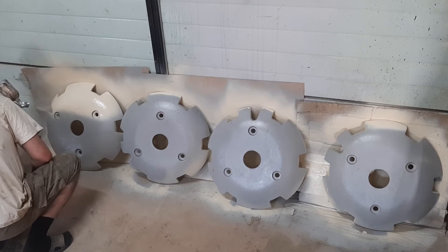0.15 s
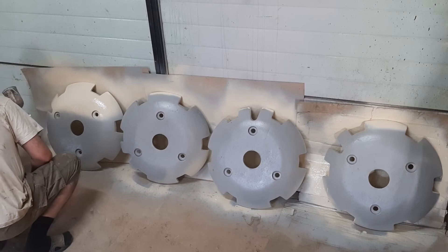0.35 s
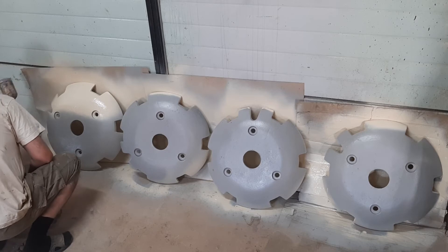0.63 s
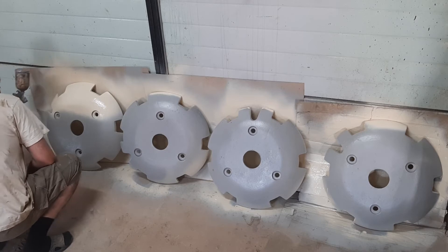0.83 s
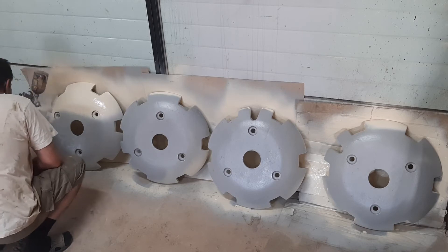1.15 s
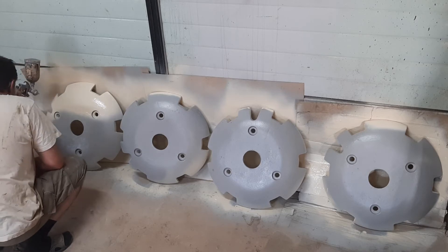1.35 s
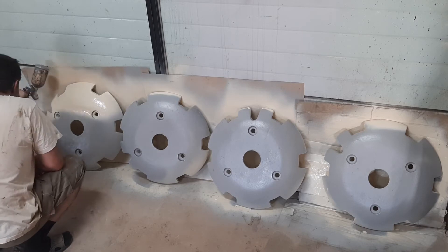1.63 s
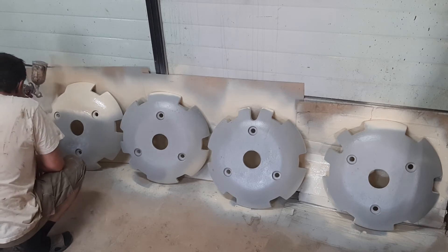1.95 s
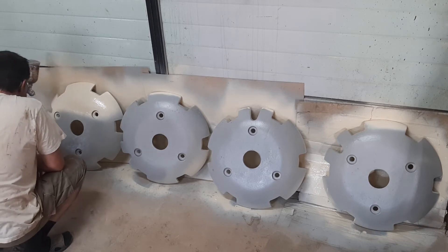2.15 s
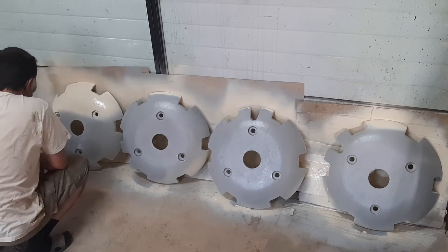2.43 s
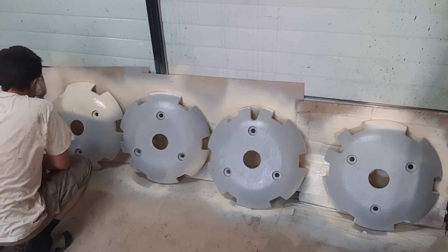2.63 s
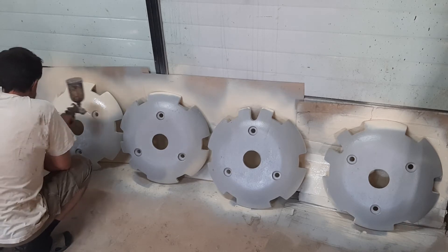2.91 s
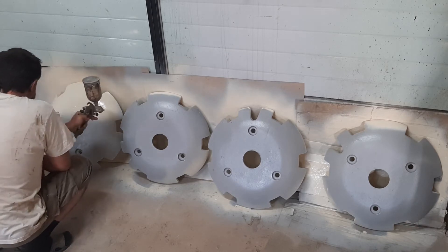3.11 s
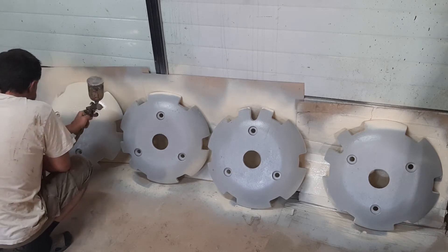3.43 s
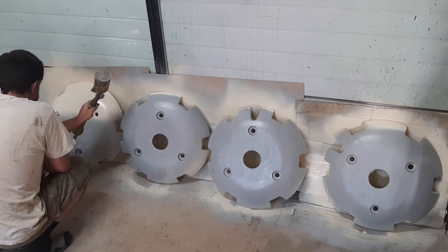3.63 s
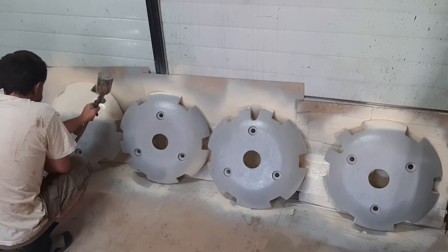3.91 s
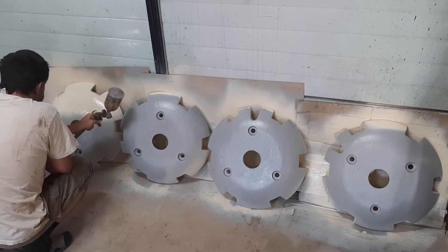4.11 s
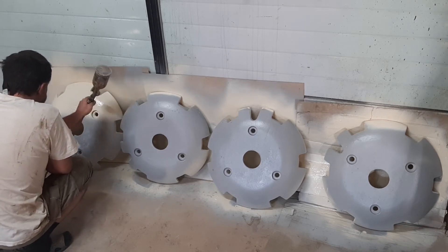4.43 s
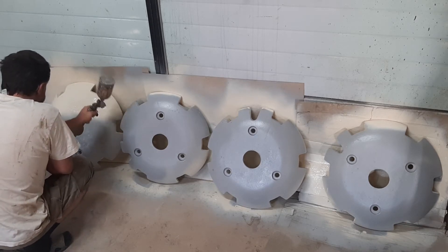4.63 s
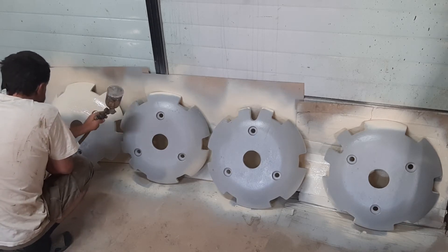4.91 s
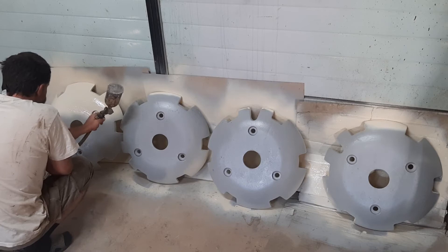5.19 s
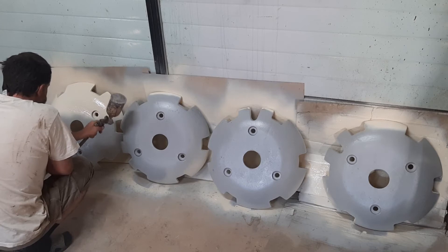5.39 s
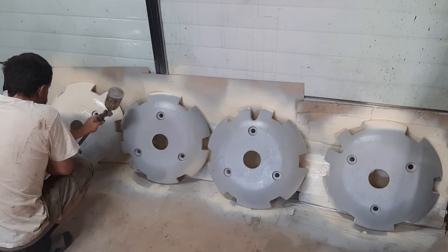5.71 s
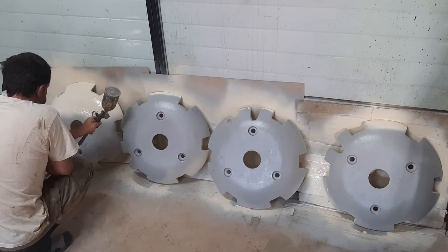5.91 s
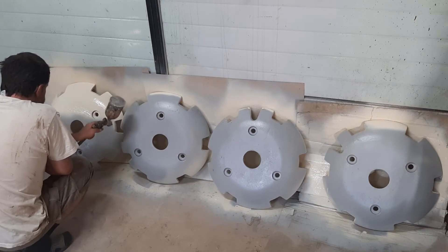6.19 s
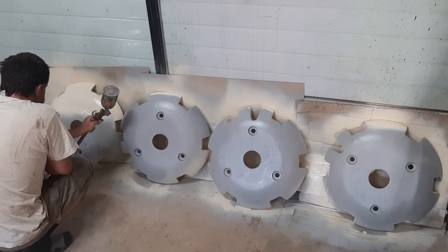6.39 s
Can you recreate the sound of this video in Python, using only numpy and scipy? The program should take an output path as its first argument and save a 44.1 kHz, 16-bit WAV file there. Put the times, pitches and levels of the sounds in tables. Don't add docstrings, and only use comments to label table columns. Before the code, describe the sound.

Short sharp blasts of spray-gun air surge, settle and cut off over hollow metal, with early cardboard scrapes and knocks in a hard-walled room.

```python
import sys
import numpy as np
from scipy import signal
from scipy.fft import rfft, irfft, next_fast_len
from scipy.io import wavfile
from scipy.ndimage import uniform_filter1d

SR = 44100
rng = np.random.default_rng(int(sys.argv[2]) if len(sys.argv) > 2 else 0)


def log_audio(samples):
    frames = np.atleast_2d(samples).T
    limited = np.clip(frames, -1, 1)
    pcm = np.round(limited * 32767).astype(np.int16)
    wavfile.write(sys.argv[1], SR, pcm)


def field_ratio(decibels):
    return 10 ** (np.asarray(decibels, dtype=float) / 20)


N = 288855

# valve opens [s], shuts [s], surge level [dB], settled level [dB],
# settling time [s].
PULLS = [
    (0.0, .424, -24, -36, 0.12),
    (0.88, 1.249, -24.5, -35, 0.1),
    (1.609, 1.924, -26.5, -34.5, 0.079),
    (2.422, 3.059, -26.5, -36.5, 0.12),
    (3.819, 4.141, -23, -36, 0.11),
    (4.528, 4.768, -25, -33, 0.058),
    (5.16, 5.498, -24.5, -34, 0.09),
    (5.832, 6.13, -24.5, -34, 0.08),
]


def evened(x):
    return x / np.sqrt(np.mean(x ** 2) + 1e-20)


def read(points, hz):
    f, value = np.transpose(points)
    return np.interp(np.log(hz + 1), np.log(f + 1), value)


def hiss(colour, patchy_db):
    a, b, patches = rng.standard_normal((3, N // 256 + 5, 513)).transpose(0, 2, 1)
    patches = uniform_filter1d(patches, size=14, axis=0)
    patches = evened(uniform_filter1d(patches, size=10, axis=1))
    colour_db = read(colour, np.fft.rfftfreq(1024, 1 / SR))[:, None]
    z = (a + 1j * b) * field_ratio(colour_db + patchy_db * patches)
    return evened(signal.istft(z, nperseg=1024, noverlap=768)[1][:N])


def ring(x, modes):
    out = []
    for k, (hz, width, db) in enumerate(modes):
        peak = signal.iirpeak(hz, hz / width, SR)
        out.append((-1) ** k * field_ratio(db) * signal.lfilter(*peak, x))
    return np.array(out)


def played(tables, level, rise, fall):
    out = np.zeros(N)
    for rows, up in zip(tables, rise * np.ones(len(tables))):
        s, *columns = np.transpose(rows)
        first = max(0, round((s[0] - 70 / up) * SR))
        last = min(N, round((s[-1] + 70 / fall) * SR))
        at = np.arange(first, last)
        ramp = up * np.maximum(s[0] - at / SR, 0) + fall * np.maximum(at / SR - s[-1], 0)
        out[at] += field_ratio(np.interp(at / SR, s, level(columns)) - ramp)
    return out


def strokes(rows):
    return [[(start, db, *more), (end, end_db, *more)] for start, end, db, end_db, *more in rows]


def valve():
    # splash level [dB], its sag [dB/s], hollow roar level [dB], moment the fan faces the hollow [s].
    aim_rows = [(-37.5, 6.5, -43, 0.4), (-35, 14.5, -45.5, 1.276), (-37, -1.5, -44, 1.873),
                (-36, 7, -44, 2.805), (-36.5, 4.5, -44, 3.994), (-36, 9, -45.5, 4.61),
                (-36, 10.5, -44, 5.39), (-36, 2, -45, 5.99)]
    out = []
    for (start, end, surge_db, settled_db, settle), (splash_db, sag, hollow_db, aim) in zip(PULLS, aim_rows):
        s = np.linspace(start, end, 60)
        age = s - start
        ease_db = 3.5 * np.exp((s - end) / 0.052)
        surge = np.exp(-(age / settle) ** 1.55)
        opening_dip_db = -0.5 * np.exp(-age / 0.012)
        nozzle = settled_db + (surge_db - settled_db) * surge + opening_dip_db
        splash = splash_db - sag * age - ease_db
        fill_db = 11.5 * np.exp(-age / 0.028)
        sweep_db = 26 * abs(s - aim)
        hollow = hollow_db - fill_db - sweep_db - 2.2 * ease_db
        out.append(np.transpose([s, nozzle, splash, hollow]))
    return out


def spray():
    # frequency [Hz],
    # level per hertz [dB].
    jet_colour = [(3000, -30.5), (6000, -12.5), (7900, -1), (8400, -10), (10000, -3.5), (11800, 3.5),
                  (13500, 2.5), (15000, 4), (15800, -1)]
    splash_colour = [(900, -26), (2000, -9), (4000, -2), (6000, 0), (7900, -1), (8400, -2.5),
                     (10000, -16.5), (14000, -29.5)]
    hollow_colour = [(200, -22), (400, -5), (550, 2.5), (900, 0.5), (1500, 2.5), (2200, -2.5),
                     (4000, -12.5)]
    # how fast the valve opens [dB/s], air slipping past the needle just before [dB re the surge].
    opening_rows = [(3000, -39.5), (2200, -18), (2290, -40), (1850, -33.5), (2120, -40), (3600, -33),
                    (2170, -43), (4000, -36)]
    shut = 584
    speed, creep_db = np.transpose(opening_rows)
    creep_points = [[(row[0], row[2] + db)] for row, db in zip(PULLS, creep_db)]
    creep = played(creep_points, lambda c: c[0], 700, 3000)
    pulls = valve()
    jet = hiss(jet_colour, 0.53) * (played(pulls, lambda c: c[0] + 4.24, speed, shut) + creep)
    splash = hiss(splash_colour, 1.2) * played(pulls, lambda c: c[1], speed, shut)
    hollow = hiss(hollow_colour, 2.2) * played(pulls, lambda c: c[2], speed * 0.22, shut)
    return jet + splash + hollow


def bleed():
    # whistle frequency [Hz], width [Hz], level [dB].
    whistle_modes = [(5480, 180, 0), (7700, 600, -4), (10800, 600, -5), (12400, 300, -1), (15350, 300, -4)]
    below_db, t60 = -21.5, 0.86
    tails = [[(0, -63.5)]] + [[(row[1], row[3] + below_db)] for row in PULLS]
    whistling = evened(ring(rng.standard_normal(N), whistle_modes).sum(0))
    return whistling * played(tails, lambda c: c[0], 900, 60 / t60)


def trigger():
    # start [s], tick peak [dB], level of the thin hiss behind it [dB].
    tick_rows = [
        (.799, -45, -63),
        (1.5192, -55, -70),
        (2.357, -43, -62),
        (4.4705, -36, -59),
        (5.783, -39, -55.5),
        (6.5037, -45, -64),
        (6.523, -58, -94),
    ]
    # frequency [Hz], level per hertz [dB].
    seep_colour = [(900, -38.5), (2300, -21), (2900, -12), (4200, -7.5), (6000, -0.5), (7900, -4.5),
                   (8500, -29), (9800, -18.5), (12500, -8), (15800, -4.5)]
    # frequency [Hz], width [Hz], level [dB].
    click_modes = [(4000, 2000, -13.5), (7000, 3200, -10.5), (12500, 2500, -2)]
    ticks = np.zeros(N)
    for s, db, _ in tick_rows:
        burst = rng.standard_normal(40) * np.exp(-np.arange(40) / 14)
        ticks[round(s * SR):][:40] = field_ratio(db + 5) * burst
    seep = played([[(s, db)] for s, _, db in tick_rows], lambda c: c[0], 30000, 100)
    return ring(ticks, click_modes).sum(0) + hiss(seep_colour, 1.2) * seep


def scuffs():
    # start [s], end [s], start level [dB], end level [dB], brightness of the upper modes [dB].
    scuff_rows = [(0.0, .1, -41, -61, -0.5), (.135, .14, -39, -63, -5), (.2, .23, -63, -53, -2.5),
                  (.258, .3, -40, -44, -3.5), (.325, .44, -39, -43.5, -1.4), (.63, .66, -53.5, -56, -2),
                  (.68, .683, -50.5, -48.5, 2), (.71, .79, -46.5, -43, 0), (.81, .96, -43, -57, 3),
                  (.98, .985, -50, -52, -15), (1.01, 1.1, -75, -69, 5), (1.38, 1.5, -71.5, -84, 3.5),
                  (1.578, 1.58, -79, -61, -13), (2.193, 2.3, -70, -81, -21),
                  (3.12, 3.123, -53.5, -56.5, 6.5), (3.165, 3.26, -57, -62.5, 0.5),
                  (3.523, 3.6, -70, -94, -4.5), (4.88, 5.03, -74.5, -81, -3), (5.44, 5.52, -58, -58, -20),
                  (5.724, 5.8, -84, -84, -7)]
    # frequency [Hz], width [Hz], level [dB].
    board_modes = [(410, 120, -10), (525, 50, 0), (620, 90, -4), (780, 80, -8), (937, 60, -6),
                   (1130, 90, -10), (1330, 200, -14), (1550, 160, -16), (2050, 500, -26), (3300, 1300, -40)]
    strength = field_ratio(1.27 * np.minimum(rng.exponential(1, N), 4))
    happens = rng.random(N) < 900 / SR
    slips = strength * happens * rng.choice([-1, 1], N)
    modes = ring(evened(slips) + 0.56 * rng.standard_normal(N), board_modes)
    modes = np.array([np.roll(mode, shift=997 * k) for k, mode in enumerate(modes)])
    low, high = modes[:3].sum(0), modes[3:].sum(0)
    drags = strokes(scuff_rows)
    low_drag = low * played(drags, lambda c: c[0] - 1.5, 800, 370)
    high_drag = high * played(drags, lambda c: c[0] + c[1], 800, 400)
    return (low_drag + high_drag) / np.std(low)


def knocks():
    # start [s], peak level [dB], frequency [Hz].
    knock_rows = [
        (.262, -31, 620),
        (.33, -33, 1300),
        (.345, -33, 1540),
        (.678, -32, 570),
        (.726, -35, 540),
        (.804, -30, 670),
        (.82, -33, 740),
        (.844, -34, 600),
        (2.193, -62, 520),
    ]
    out, t = np.zeros(N), np.arange(2000) / SR
    for s, db, hz in knock_rows:
        envelope = field_ratio(db - 1600 * t) * (1 - np.exp(-t / .001))
        out[round(s * SR):][:len(t)] += envelope * np.sin(2 * np.pi * hz * t)
    return out


def gust():
    # start [s], end [s], start level [dB], end level [dB].
    puff_rows = [(0.0, .07, -66, -68), (.135, .43, -65, -48), (.88, 1.02, -77, -69), (1.1, 1.26, -56, -46),
                 (1.61, 1.63, -70, -68), (1.71, 1.75, -62, -52), (1.78, 1.85, -44, -46.5),
                 (1.89, 1.93, -48, -44.5), (2.49, 2.8, -47.5, -59.5), (2.85, 3.06, -77, -60),
                 (3.85, 4.06, -45.5, -57.5), (4.11, 4.14, -59, -51), (4.555, 4.77, -43, -63.5),
                 (5.25, 5.51, -55.5, -55.5), (5.88, 5.97, -47, -53), (6.0, 6.13, -48.5, -56)]
    # frequency [Hz], level per hertz [dB].
    gust_colour = [(30, -30), (60, -15), (125, -5), (200, -4), (320, -4), (600, -22)]
    # frequency [Hz], width [Hz], level [dB].
    shop_modes = [(120, 30, -9), (163, 13, -1), (254, 18, 0), (316, 14, -2), (410, 25, -7)]
    push = np.array([hiss(gust_colour, 0.83), hiss(gust_colour, 1)])
    push = push * played(strokes(puff_rows), lambda c: c[0], 600, 217)
    return field_ratio(-8.5) * push + field_ratio(6.5) * ring(push, shop_modes).sum(0)


def hums():
    # start [s], end [s], frequency [Hz], width [Hz], level [dB].
    hum_rows = [(3.29, 3.5, 2900, 50, -85), (3.36, 3.48, 750, 25, -84), (3.36, 3.46, 1430, 50, -87),
                (3.26, 3.38, 3800, 500, -85), (6.2, 6.5, 1540, 40, -85), (6.15, 6.36, 1150, 500, -78),
                (6.24, 6.48, 2950, 40, -84), (6.3, 6.5, 780, 200, -84), (6.28, 6.45, 290, 90, -86),
                (2.275, 2.285, 2150, 100, -88), (2.1, 2.2, 4000, 80, -88), (4.33, 4.37, 1500, 90, -87)]
    # start [s], peak level [dB], frequency [Hz].
    thud_rows = [(0.499, -69, 89), (0.869, -62, 80.7), (1.639, -61, 75.4), (2.429, -59, 129),
                 (3.38, -73, 83.4), (4.538, -60, 117), (5.85, -59, 98.4), (.78, -57, 120), (.46, -65, 68.3),
                 (3.09, -71, 60), (3.35, -75, 55)]
    out, t = np.zeros(N), np.arange(SR // 8) / SR
    for start, end, hz, width, db in hum_rows:
        tone = evened(ring(rng.standard_normal(N), [(hz, width, 0)])[0])
        out += tone * played([[(start, db), (end, db - 2.5)]], lambda c: c[0], 400, 300)
    age = t / 0.0079
    for s, db, hz in thud_rows:
        out[round(s * SR):][:len(t)] += field_ratio(db) * age * np.exp(1 - age) * np.sin(2 * np.pi * hz * t)
    return out


def room(x, count=6):
    # frequency [Hz], reverberation time t60 [s].
    decay_times = [(100, 0.52), (500, 0.35), (2000, 0.35), (6000, 0.32), (12000, 0.2), (16000, 0.16)]
    lead = 900
    taps = np.zeros((count, 2, SR // 2))
    at = np.arange(60, SR // 2 - 8, 8)
    at = at + rng.integers(0, 8, (count, 2, len(at)))
    np.put_along_axis(taps, at, rng.choice([-1., 1.], at.shape), 2)
    hz, t, z = signal.stft(taps, SR, nperseg=256)
    decay = field_ratio(-60 * t / read(decay_times, hz)[:, None])
    tails = signal.istft(z * decay, SR, nperseg=256)[1]
    turn = (np.arange(N) / 800 - np.arange(count)[:, None]) % count
    fed = x * np.sin(np.pi / 2 * np.minimum(turn, 2))
    fed = np.pad(fed, ((0, 0), (lead, 0)), "reflect")
    size = next_fast_len(N + SR)
    wet = (rfft(fed, size)[:, None] * rfft(tails, size)).sum(0)
    return irfft(wet, size)[:, lead:lead + N] / np.linalg.norm(tails[0, 0])


def quiet():
    # frequency [Hz], level per hertz [dB].
    quiet_colour = [(35, -39), (60, -6.5), (184, -14.5), (237, -15), (631, -20), (1030, -25.5), (4570, -18),
                    (6040, -8), (7810, -10), (9190, -22), (11300, -8), (12700, -10.5), (14600, -7),
                    (15700, -7.5)]
    return field_ratio(-75 + 7.0) * np.array([hiss(quiet_colour, 2.3), hiss(quiet_colour, 3.3)])


def scene():
    wide = spray() + bleed() + scuffs()
    sharp = hums() + trigger() + knocks()
    near = field_ratio(-8) * wide + sharp
    direct = np.array([near, np.roll(near, shift=4)])
    return direct + room(field_ratio(-0.25) * wide + field_ratio(-0.5) * sharp) + gust() + quiet()


def mono_edge(t):
    # starts [s], lowest at [s], lowest edge [Hz], free again [s].
    narrowings = [
        (-.03, .55, 9000, .92),
        (.55, 1.38, 10000, 1.57),
        (1.66, 2.1, 10400, 2.24),
        (2.74, 3.2, 9700, 3.41),
        (5.87, 6.28, 10400, 6.44),
    ]
    free, knee = 16500, 12800
    edges = [np.interp(t, [start, start + .14, lowest, end], [free, knee, low, free])
             for start, lowest, low, end in narrowings]
    return np.min(edges, axis=0)


def roll_off(x):
    return signal.sosfilt(signal.butter(12, 17020, fs=SR, output="sos"), x)


def record(dry):
    # frequency [Hz], left-right likeness [0 to 1].
    likeness = [(30, 0), (130, 0.83), (300, 0.94), (640, 0.49), (1400, 0.079), (2500, .0)]
    # frequency [Hz], left minus right [dB].
    lean_points = [(100, -2.5), (600, -3.5), (2500, -3), (5000, -2), (7700, -1), (8500, -4), (12000, -5),
                   (15800, -4)]
    hz, t, (left, right) = signal.stft(dry, SR, nperseg=1024, noverlap=768)
    same = np.clip(read(likeness, hz), 0, .99)[:, None]
    mid = (left + right) / 2 * np.sqrt(1 + same)
    side = (left - right) / 2 * np.sqrt(1 - same)
    joint = hz[:, None] > mono_edge(t)
    mid, side = np.where(joint, left, mid), np.where(joint, 0, side)
    lean = field_ratio(read(lean_points, hz)[:, None] / 2)
    passed = (hz < 15780) / np.sqrt(1 + (45 / (hz + 1)) ** 4)
    mid, side = np.array([mid, side]) * passed[:, None]
    both = np.array([(mid + side) * lean, (mid - side) / lean])
    ports = signal.istft(both, SR, nperseg=1024, noverlap=768)[1]
    return roll_off(ports[:, :N])


dry = scene()
out = record(dry)
log_audio(out)
```